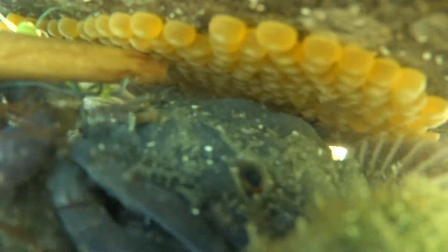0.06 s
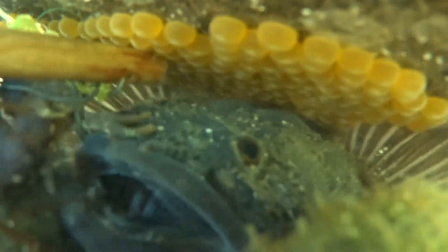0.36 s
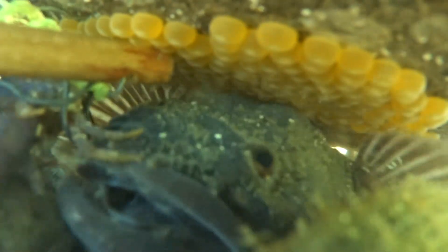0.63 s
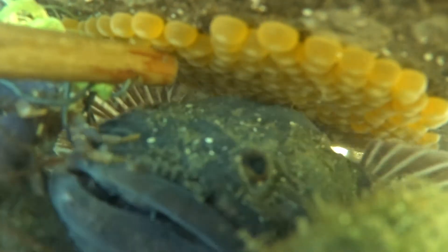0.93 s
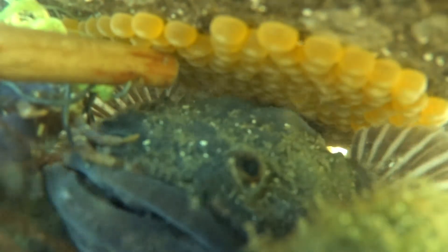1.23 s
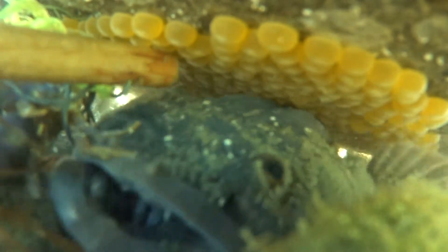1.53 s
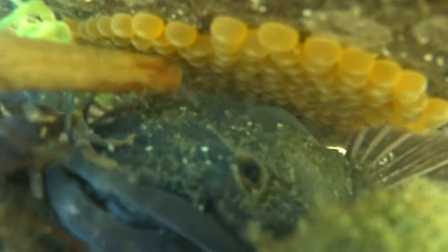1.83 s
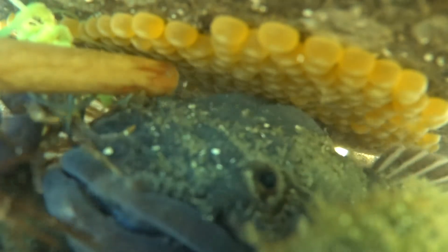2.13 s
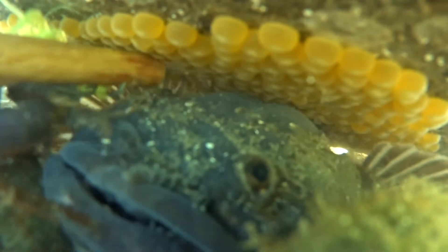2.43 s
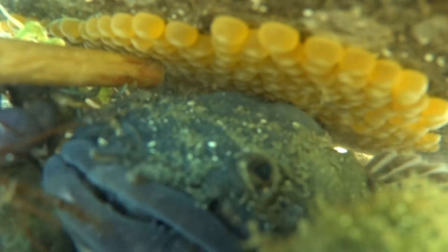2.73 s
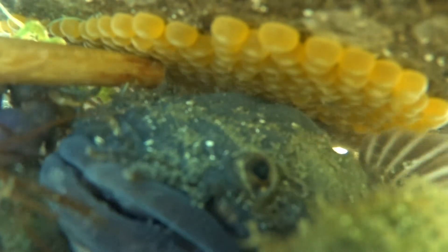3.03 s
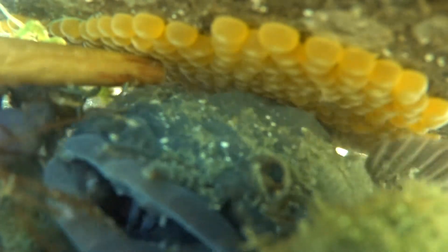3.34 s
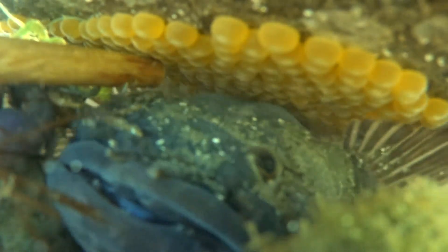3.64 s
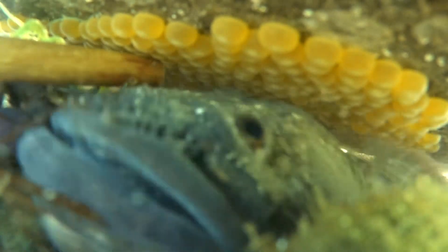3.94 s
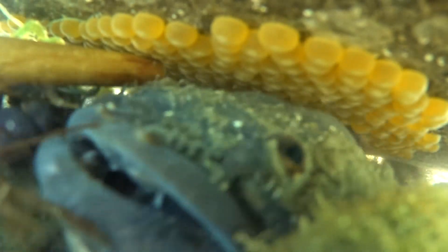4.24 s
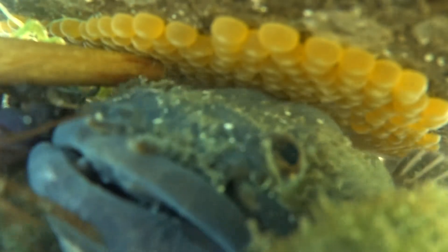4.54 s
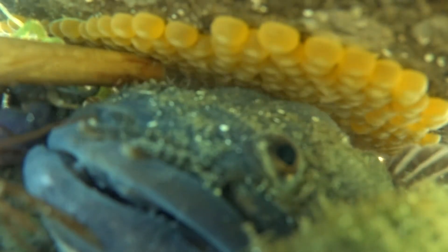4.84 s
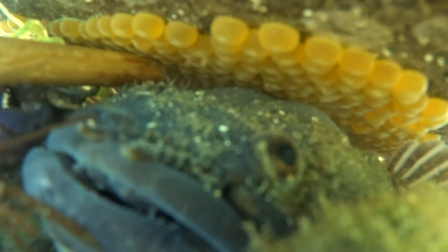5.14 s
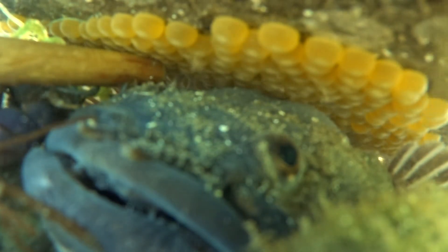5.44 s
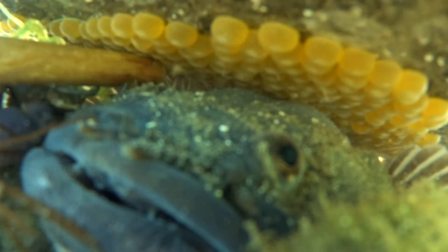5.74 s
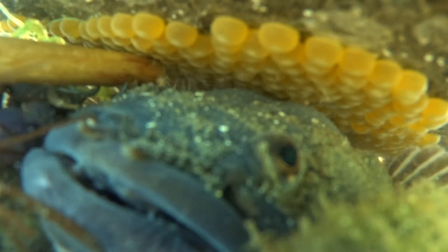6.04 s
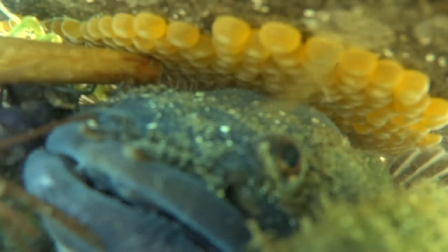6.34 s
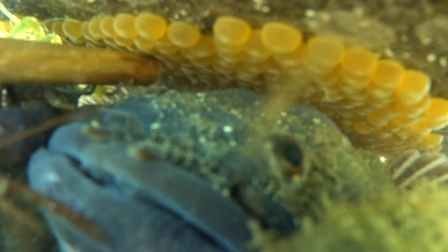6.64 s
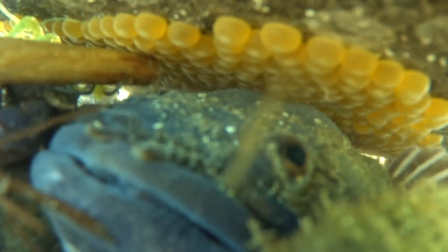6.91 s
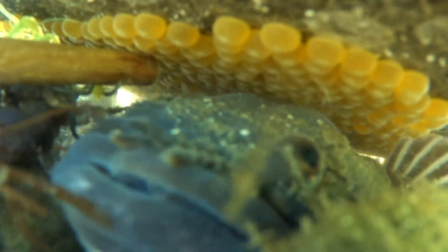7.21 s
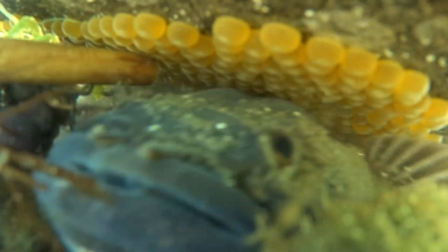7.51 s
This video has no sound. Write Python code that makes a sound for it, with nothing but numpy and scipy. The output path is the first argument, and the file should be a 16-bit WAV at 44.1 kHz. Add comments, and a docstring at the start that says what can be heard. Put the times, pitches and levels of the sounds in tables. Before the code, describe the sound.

Through an underwater microphone, steady water noise and the faint hum of a far-off machine lie beneath a fish in its rocky hollow. It opens with one short, low, stuttering growl. Then it moves about, with light scrapes of grit and a few sparse pebble knocks. In the second half the pebbles clack louder and closer together, mixed with low rumbling scrapes and soft thuds.

```python
"""A fish growls from its nest under a rock, guarding its eggs: sonic muscles drum on its swim bladder,
stumble, and drum on. Then it shifts about, scraping grit and knocking pebbles, with a few dull thuds.
One underwater microphone picks this up over water noise and the faint hum of a distant machine.
Its two channels carry the same signal, far out of phase, each with a little hiss of its own."""
import sys
import numpy as np
from scipy import signal
from scipy.fft import rfft, irfft, next_fast_len
from scipy.io import wavfile

SR = 44100
rng = np.random.default_rng(int(sys.argv[2]) if len(sys.argv) > 2 else 0)


def digitize_waveform(pressure):
    """Quantize a signal to 16-bit integers and store it at the path in sys.argv[1].

    Rows of a 2-D input are taken as channels; values are limited to [-1, 1].
    """
    field = np.atleast_2d(pressure).T
    bounded = np.clip(field, -1, 1)
    quanta = np.round(bounded * 32767).astype(np.int16)
    wavfile.write(sys.argv[1], SR, quanta)


N = 342657


def amp(db):
    """Decibels to gain."""
    return 10 ** (np.asarray(db) / 20)


def unit(x):
    """Scaled to rms 1."""
    return x / np.sqrt(np.mean(x ** 2) + 1e-20)


def along(points, hz):
    """(frequency [Hz], value) points read on a log axis."""
    freqs, values = np.transpose(points)
    return np.interp(np.log(hz + 1), np.log(freqs + 1), values)


def filtered(x, response):
    """x passed through a response, given as a function of frequency."""
    size = 2 * next_fast_len(N // 2 + SR // 4)
    return irfft(rfft(x, size) * response(np.fft.rfftfreq(size, 1 / SR)), size)[..., :N]


def causal(gain):
    """The response with this gain that rings only after the blow."""
    cepstrum = irfft(np.log(np.maximum(gain, 1e-6)))
    half = len(cepstrum) // 2
    return np.exp(rfft(np.r_[cepstrum[0], 2 * cepstrum[1:half], np.zeros(half)]))


def delay(hz, s):
    """The response of a delay of s seconds."""
    return np.exp(-2j * np.pi * hz * s)


def resonances(modes, hz, turn=1):
    """Response of (frequency [Hz], width [Hz], gain [dB]) modes; a negative turn opposes neighbours."""
    return sum(turn ** k * amp(db) * 1j * hz * width / (centre ** 2 - hz ** 2 + 1j * hz * width)
               for k, (centre, width, db) in enumerate(modes))


def noise(gain):
    """Noise of rms 1, shaped by a gain over frequency."""
    return unit(filtered(rng.standard_normal(N), gain))


def band(centre_hz, width_hz):
    """Narrow noise of rms 1."""
    return noise(lambda hz: np.abs(resonances([(centre_hz, width_hz, 0)], hz)) ** 2)


def add(track, s, sound):
    """Mix a sound into the track at time s."""
    part = track[max(round(s * SR), 0):][:len(sound)]
    part += sound[:len(part)]


def muscle_beats(end_s=0.589, jitter_s=0.00046, scatter_db=1, accent_db=1.0):
    """One tug per muscle beat, slightly uneven; every third is accented, and a faltering muscle skips."""
    # runs of beats, each lasting until the next:
    # (start [s], rate [beats/s], level [dB], misfire of every other beat [dB])
    runs = [(.0072, 87, 1.5, -4), (0.1109, 84, 0, 1), (0.1705, 75, 0, -15), (0.251, 84, -3, 3),
            (0.3215, 88, -0.5, -1), (.436, 90, -1, 1), (.503, 84, -2, 2.5), (0.5502, 77, 0, -4)]
    stops = [run[0] for run in runs[1:]] + [end_s]
    tugs = np.zeros(N)
    for (start, rate, run_db, misfire_db), stop in zip(runs, stops):
        count = max(round((stop - start) * rate), 1)
        for k, s in enumerate(np.linspace(start, stop, count, endpoint=False)):
            late, strong = rng.standard_normal(2)
            db = run_db + accent_db * (k % 3 == 0) + misfire_db * (k % 2) + scatter_db * strong
            add(tugs, s + jitter_s * late, amp([db]))
    return tugs


def growl(release_s=0.003326, release_db=-1.5, bladder_lag_s=0.00234, lead_s=0.0018, edge_hz=865,
          bladder_db=-0.2, hollow_db=-2.0):
    """Each beat swings the bladder; its pull and release ring the hollow, so hard beats are brighter."""
    # modes of the swim bladder: (frequency [Hz], width [Hz], gain [dB])
    bladder = [(104.5, 96, 9.5), (229.5, 63.4, 23.5), (275, 37.4, 23), (420.5, 96, 15)]
    # the nest hollow as the growl rings it: (frequency [Hz], width [Hz], gain [dB])
    hollow = [(649, 43.7, 27), (700, 254, 15), (918, 28, 27), (1124, 47, 22)]
    tugs = muscle_beats()
    swing = filtered(np.sqrt(tugs),
                     lambda hz: resonances(bladder, hz, turn=-1.048) * delay(hz, bladder_lag_s))
    snap = filtered(tugs,
                    lambda hz: resonances(hollow, hz) * (amp(release_db) * delay(hz, release_s) - 1))
    drumming = amp(bladder_db) * swing + amp(hollow_db) * snap
    # soft tissue passes no treble; the pull starts shortly before the beat peaks
    tissue = signal.butter(8, 1, analog=True)
    return filtered(drumming, lambda hz: signal.freqs(*tissue, hz / edge_hz)[1] * delay(hz, -lead_s))


def background(water_db=-56.0):
    """The bed of the place: steady water noise and the wavering hum of a distant machine."""
    # lines of the machine's hum: (frequency [Hz], width [Hz], level [dB])
    hum_lines = [(114.6, 6.9, -68.5), (231.8, 2.2, -65), (689, 4.2, -63), (803.5, 6.3, -63.5)]
    # spectrum of the water around the microphone: (frequency [Hz], relative level [dB])
    water = [(20, -12), (60, -14), (125, -3.5), (170, -2), (240, -1), (320, -1.5), (520, -1), (670, 1),
             (880, -3.5), (1150, -4), (1600, -10.5), (2600, -19), (5000, -27), (11000, -29.5)]
    hum = sum(amp(db) * band(hz, width_hz) for hz, width_hz, db in hum_lines)
    return hum + amp(water_db) * noise(lambda hz: amp(along(water, hz)))


def stroke(peak_s, length_s, bluntness, rise_share=0.55, depth_db=22.5):
    """Gain of one movement: it builds from depth_db down and lets go; blunter ones hold their peak."""
    t = np.arange(N) / SR - peak_s
    from_peak = np.maximum(-t / rise_share, t / (1 - rise_share)) / length_s
    return amp(-depth_db * np.minimum(from_peak, 10) ** bluntness)


def scrape(grains_per_s=800, rumble_hz=72, rumble_width_hz=70, bluntness=1.06):
    """Each shift of the body sets off many tiny slips of grit, over the rumble of its sliding."""
    # spectrum of slipping grit: (frequency [Hz], relative level [dB])
    grit_spectrum = [(50, -4.5), (200, -4.5), (520, -11), (660, 8.5), (850, -3.5), (1150, 2), (1550, -13.5),
                     (2000, -9.5), (3000, -31.5), (5400, -44.5), (6500, -31), (7900, -43), (9300, -37.5),
                     (11000, -52.5)]
    # shifts of the body: (time of the hardest push [s], length [s], grit [dB], rumble [dB])
    moves = [(0.457, 0.3, -38.5, -76), (0.965, 0.3, -47, -65), (2.245, 0.37, -54.5, -70),
             (2.477, 0.4, -46, -57), (2.682, 0.08, -49, -65), (5.636, .24, -62, -48.5),
             (5.968, 0.59, -55.5, -52), (6.373, 0.33, -48.5, -56), (7.08, .14, -56, -63),
             (7.583, 0.17, -49.5, -47), (7.712, 0.36, -53, -55.5)]
    grains = (rng.random(N) < grains_per_s / SR) * rng.standard_normal(N)
    grit = unit(filtered(grains, lambda hz: causal(amp(along(grit_spectrum, hz)))))
    rumble = band(rumble_hz, rumble_width_hz)
    return sum(stroke(s, length_s, bluntness) * (amp(grit_db) * grit + amp(rumble_db) * rumble)
               for s, length_s, grit_db, rumble_db in moves)


def swell(t, hz, swell_s):
    """A heavily damped ring whose envelope peaks at 1 after swell_s."""
    return t / swell_s * np.exp(1 - t / swell_s) * np.sin(2 * np.pi * hz * t)


def pebble(t, hz, cycles, hardness_db, tilt_per_octave=5.4, top_hz=2350):
    """One clack: the harder the contact, the stronger the upper modes; they die sooner."""
    # modes of a pebble at hardness 0 dB: (frequency [multiple of the pitch], level [dB])
    modes = [(1, 0), (1.75, -2.5), (2.45, -7.5), (3.25, -5.5)]
    clack = np.zeros(len(t))
    for k, (ratio, db) in enumerate(modes):
        mode_hz = ratio * hz
        gain = amp(db + tilt_per_octave * hardness_db * np.log2(ratio))
        gain /= np.hypot(1, (mode_hz / top_hz) ** 10)  # the water smothers high modes
        clack += (-1) ** k * gain * swell(t, mode_hz, cycles / mode_hz)
    return clack


def thud(floor_hz=83, swell_s=0.0055):
    """The nest floor gives a few slow cycles under any blow."""
    return swell(np.arange(SR // 4) / SR, floor_hz, swell_s)


def knocks(crack_db=7, crack_t60=0.016, crack_rise_s=0.00064,
           ring_db=3, ring_db_per_octave=-22, ring_rise_s=0.0024,
           thud_db=-22, thud_db_per_octave=-10, thud_lag_s=0.0045,
           echo_db=-11, echo_t60=0.041, echo_rise_s=0.003):
    """Pebble clacks that crack, ring the hollow, thud and echo off rocks, plus one faint, dry click."""
    # pebble clacks, and the broadband click at 3.28 s:
    # (time [s], level [dB], pitch [Hz], rise to the peak [cycles], hardness [dB])
    events = [(.6705, -32.5, 970, .7, -4), (.849, -32, 750, 2.6, -22), (2.229, -37, 1060, 1.3, -16),
              (2.381, -37, 980, 0.99, -14), (2.501, -28, 1110, 0.95, -11.5), (2.534, -39, 765, 2, -18),
              (3.2825, -39.5, 302, 0.14, 1), (5.5761, -22, 730, 0.89, -10.5), (5.8048, -33, 1067, 2.7, -3),
              (6.067, -26, 930, 1, -20), (6.1774, -17, 1090, 1.8, -5), (6.1962, -26.5, 1150, 1.2, -2),
              (6.2098, -19, 1088, 1.85, 0), (6.222, -17.5, 1103, 1.6, -5), (6.281, -16.5, 716, 0.23, -4),
              (6.292, -21.5, 910, .25, -9), (6.6255, -24, 1156, 1.33, -7.5),
              (7.5454, -21.5, 722, 1.46, 0.83), (7.6005, -37, 696, 1.1, -1), (7.677, -43.5, 700, 1.4, -12)]
    # modes of the water-filled hollow, main one first: (frequency [Hz], level [dB], t60 [s])
    nest = [(657.5, 2.5, 0.071), (770, -11, 0.023)]
    # spectrum of the crack: (frequency [Hz], gain [dB])
    crack_spectrum = [(60, -4.5), (150, -3.5), (450, 5.5), (800, 12), (1300, 6.5), (2000, -2.5),
                      (3000, -17), (3800, -25), (5500, -29), (6700, -20.5), (7900, -34), (9400, -23.5),
                      (11000, -33)]
    body, cracks = np.zeros(N), np.zeros(N)
    t = np.arange(SR // 8) / SR
    hollow = sum(amp(db - 60 * t / t60) * np.sin(2 * np.pi * hz * t) for hz, db, t60 in nest)
    hollow *= 1 - np.exp(-t / ring_rise_s)
    echo_envelope = amp(-60 * t / echo_t60) * (1 - np.exp(-t / echo_rise_s))
    crack_envelope = amp(crack_db - 60 * t / crack_t60) * (1 - np.exp(-t / crack_rise_s))
    for s, db, hz, cycles, hardness_db in events:
        clack = pebble(t, hz, cycles, hardness_db)
        octaves = np.log2(hz / nest[0][0])  # above the hollow's main mode
        # every pebble lies elsewhere and has its own dense reflections
        walls = rng.standard_normal(len(t)) * echo_envelope
        echo = signal.fftconvolve(clack, walls / np.linalg.norm(walls))[:len(t)]
        # a clack far off the hollow's pitch, or shorter than one cycle, hardly sets it going
        ring = amp(ring_db + ring_db_per_octave * abs(octaves)) * min(cycles, 1) * hollow
        add(body, s, amp(db) * (clack + ring + amp(echo_db) * echo))
        # higher-pitched pebbles are lighter and thud less
        add(body, s + thud_lag_s, amp(db + thud_db + thud_db_per_octave * octaves) * thud())
        add(cracks, s, amp(db + hardness_db) * crack_envelope * rng.standard_normal(len(t)))
    return body + filtered(cracks, lambda hz: causal(amp(along(crack_spectrum, hz))))


def swish(turn_s=4.08, length_s=0.41, centre_hz=200, width_hz=170, db=-54, bluntness=2.9):
    """A dull rush of water as the fish turns its head once."""
    return amp(db) * stroke(turn_s, length_s, bluntness) * band(centre_hz, width_hz)


def floor_thuds():
    """Low, dull thuds on the nest floor, some alone, some under a pebble's clack."""
    # thuds on the nest floor: (time [s], level [dB])
    blows = [(5.791, -43.5), (5.934, -40), (6.283, -41.5), (7.606, -33), (7.675, -45)]
    track = np.zeros(N)
    for s, db in blows:
        add(track, s, amp(db) * thud())
    return track


def scene():
    """Everything reaches one underwater microphone, whose signal feeds both channels."""
    pressure = growl() + knocks() + floor_thuds() + scrape() + swish() + background()
    return np.array([pressure, pressure])


def record(dry, hiss_db=-62.0, top_hz=11150):
    """The right channel is turned in phase against the left; each adds hiss, and both end at top_hz."""
    # phase of the left channel over the right: (frequency [Hz], lead [rad])
    phase_lead = [(10, -4), (60, 0.7), (120, 1.5), (260, 2), (600, 2.5), (1200, 2.5), (2000, 2.5),
                  (2500, 3.5), (3300, 4), (5500, 5), (6600, 7.5), (7800, 7), (9200, 7), (11000, 7.5)]
    # spectrum of each channel's hiss: (frequency [Hz], relative level [dB])
    hiss_spectrum = [(20, 6), (120, 2), (700, -2), (1150, -8), (1600, -7.5), (2600, -9), (5000, -17.5),
                     (11000, -28)]
    left, right = dry
    turned = np.array([left, filtered(right, lambda hz: np.exp(-1j * along(phase_lead, hz)))])
    hiss = amp(hiss_db) * np.array([noise(lambda hz: amp(along(hiss_spectrum, hz))) for _ in dry])
    return filtered(turned + hiss, lambda hz: hz < top_hz)


dry = scene()
out = record(dry)
digitize_waveform(out)
```